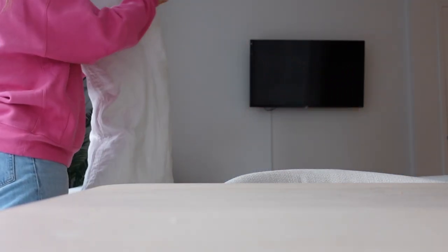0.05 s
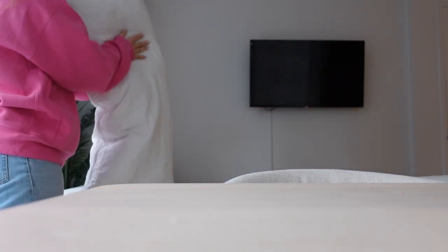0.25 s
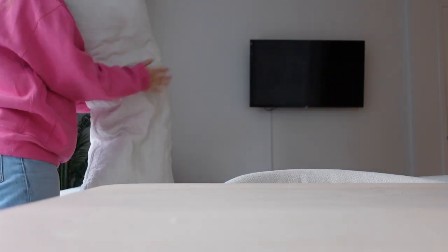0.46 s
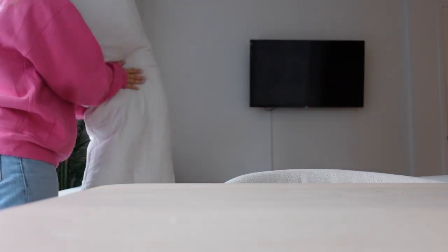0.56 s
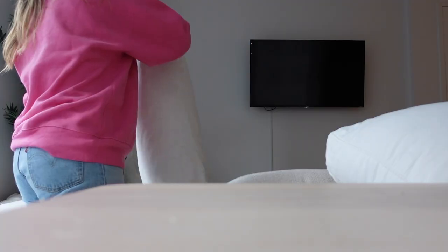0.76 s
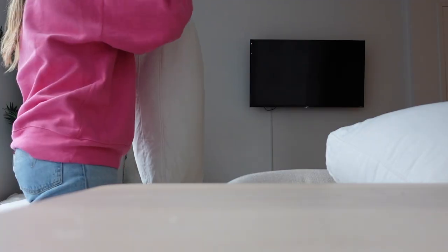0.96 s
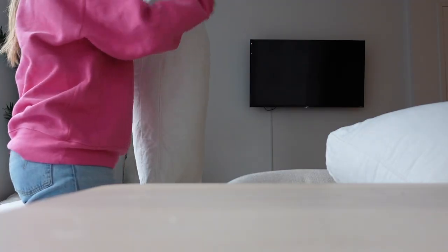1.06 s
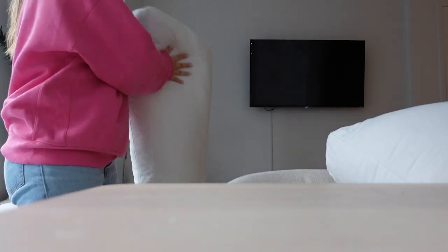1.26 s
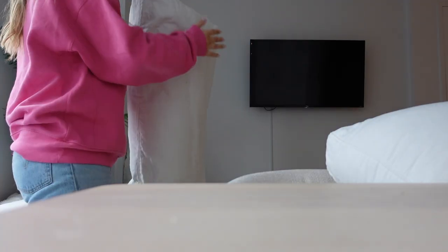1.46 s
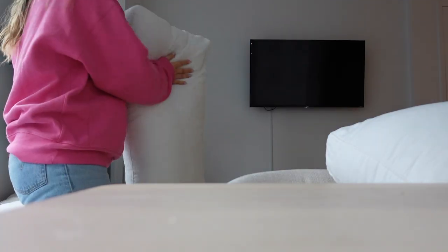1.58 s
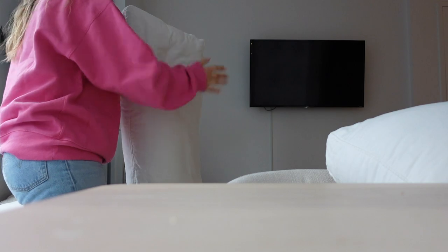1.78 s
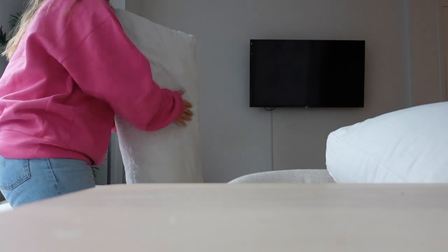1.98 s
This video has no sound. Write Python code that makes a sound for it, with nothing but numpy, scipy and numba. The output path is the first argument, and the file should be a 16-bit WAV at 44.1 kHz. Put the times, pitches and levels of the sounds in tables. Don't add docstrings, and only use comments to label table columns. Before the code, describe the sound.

Couch pillow patted by hand in a bare, ringing living room, a couple of metres from the microphone. A pat's tail and faint bracelet tinkle open; quick slappy thumps cluster at 0.2-0.27 s, and a strong one lands at 0.53. At 0.77 the tail cuts abruptly to rustling cloth. One dull thump follows at 1.24, a scuffed double at 1.6, a softer cluster at 1.9, then a filling shuffle at 2.0.

```python
import sys
import numpy as np
from scipy import signal
from scipy.fft import rfft, irfft
from scipy.io import wavfile
from scipy.ndimage import uniform_filter1d
from numba import njit

SR = 44100
rng = np.random.default_rng(int(sys.argv[2]) if len(sys.argv) > 2 else 0)


def dump(signal):
    limited = np.clip(np.atleast_2d(signal).T, -1, 1)
    pcm = np.round(limited * 32767).astype(np.int16)
    wavfile.write(sys.argv[1], SR, pcm)


def linear_from_db(decibels):
    return 10 ** (np.asarray(decibels, float) / 20)


N = 89434
RING_OUT = 28672

# freq_hz [Hz], level_db [dB], t60_s [s], side_db [dB re mid]
TAIL = [(60, 4, 0.3, -33), (194, 3, 0.39, -26.5), (530, 7.5, 0.43, -16.5), (1120, 7, 0.44, -9),
        (3060, -2, 0.45, -8), (5940, -1.5, 0.46, -7), (9500, -4.5, 0.38, -7), (16000, 9, 0.37, -10)]


def read(table, hz, order=1):
    table = np.array(table, float)
    return np.interp(np.log(np.maximum(hz, 1)), np.log(table[:, 0]), table[:, order])


def noise(table, size):
    gain = linear_from_db(read(table, np.fft.rfftfreq(size, 1 / SR)))
    x = irfft(rfft(rng.standard_normal(size)) * gain, size)
    return x / x.std()


def walk(rate_hz):
    k = int(SR / rate_hz)
    steps = np.repeat(rng.standard_normal(N // k + 1), k)
    x = uniform_filter1d(steps, k)[:N]
    return x / x.std()


def rings(table, t, gain, phase):
    total = 0
    for (hz, db, t60_s), g, p in zip(table, gain, phase):
        total = total + g * linear_from_db(db - 60 * t / t60_s) * np.sin(2 * np.pi * hz * t + p)
    return total


def hum():
    # freq_hz [Hz], level_db [dB]
    hum_colour = [(15, -65), (25, -16), (269, 3), (749, -12.5), (1120, -14), (1680, -24), (2030, -21.5),
                  (5520, -33), (15800, -34.5)]
    level_db, wander_db = -49.5, 1.2
    side_colour = [(hz, db + read(TAIL, hz, order=3)) for hz, db in hum_colour]
    mid = linear_from_db(level_db + wander_db * walk(9.92)) * noise(hum_colour, N)
    side = linear_from_db(level_db - 11) * noise(side_colour, N)
    return np.array([mid, side])


def cloth():
    # time_s [s], level_db [dB]
    rub_effort = [(0, -48), (0.121, -58.5), (.19, -55.5), (.4, -65), (.5, -57), (.7, -64), (.765, -62),
                  (0.774, -51.5), (.87, -55), (.93, -60), (1.05, -56.5), (1.15, -55), (1.232, -49.5),
                  (1.45, -55), (1.56, -70), (1.78, -57.5), (1.88, -67), (2.03, -58)]
    # freq_hz [Hz], level_db [dB]
    rub_colour = [(290, -40), (500, -26), (1440, -6), (2870, -4), (3130, -6.5), (5190, -8), (15800, -18.5)]
    # centre_s [s], length_s [s], level_db [dB], centre_hz [Hz]
    shuffles = [
        (0.868, 0.04, -49.5, 940),
        (0.83, .07, -56, 236),
        (1.01, 0.031, -65, 450),
        (1, 0.027, -54, 230),
        (2, 0.034, -34, 520),
        (0.41, .025, -62, 700),
        (1.59, 0.0075, -28, 970),
        (1.622, 0.0096, -42, 4300),
    ]
    flicker_db = 1.2
    t = np.arange(N) / SR
    effort_db = np.interp(t, *np.array(rub_effort).T)
    hiss = np.array([noise(rub_colour, N), linear_from_db(-8) * noise(rub_colour, N)])
    out = hiss * linear_from_db(effort_db + flicker_db * walk(70.2))
    for centre_s, length_s, db, hz in shuffles:
        colour = [(hz / 3, -30), (hz / 1.25, 0), (hz * 1.35, 0), (hz * 3, -30)]
        out[0] += linear_from_db(db) * noise(colour, N) * np.exp(-((t - centre_s) / length_s) ** 2)
    return out


def bracelet():
    partial_hz = [5227, 8823, 12990]
    # level_db [dB], t60_s [s]
    partial_decay = [(-2, .25), (-6, .22), (-3, .16)]
    # start_s [s], level_db [dB]
    knocks = [
        (0, -56),
        (.046, -57),
        (.073, -63),
        (.385, -69),
    ]
    jangle_db = 4
    partials = [(hz, *row) for hz, row in zip(partial_hz, partial_decay)]
    out = np.zeros(N)
    for start_s, db in knocks:
        t = np.arange(N) / SR - start_s
        gain_chance, phase = rng.standard_normal((len(partials), 2)).T
        out += linear_from_db(db) * (t >= 0) * rings(partials, np.maximum(t, 0), linear_from_db(gain_chance), phase)
    return np.array([out, 0.4 * out]) * linear_from_db(jangle_db * walk(190))


def tail_bands():
    level_db, rise_s = -28.5, 0.0031
    t = np.arange(RING_OUT) / SR
    f = np.fft.rfftfreq(RING_OUT, 1 / SR)
    white = rfft(rng.standard_normal((2, RING_OUT)))
    rise = 1 - np.exp(-(t / rise_s) ** 2)
    bands, fades = [], []
    for hz in 44 * 2 ** np.arange(0, 9, .5):
        octaves = np.log2(np.maximum(f, 1) / hz)
        band = irfft(white * np.cos(np.pi * np.clip(octaves, -.5, .5)) ** 2, RING_OUT)
        bands.append(band * np.array([[1], [linear_from_db(read(TAIL, hz, order=3))]]))
        fade_db = level_db + read(TAIL, hz) - 60 * t / read(TAIL, hz, order=2)
        fades.append(linear_from_db(fade_db) * rise)
    return np.array(bands), np.array(fades)[:, None]


def room(bands, fades):
    # freq_hz [Hz], level_db [dB], t60_s [s]
    room_modes = [(81.8, -26, 0.7), (103.3, 2.5, 0.24), (127.4, -5.5, 0.65), (166.1, -22, 0.91),
                  (189.4, -2, 0.39), (214.1, 2.5, 0.29), (247.7, -13.5, 0.42), (283, -0.5, 0.42),
                  (310.4, -3.5, 0.32), (347.2, 6.5, 0.16), (417, -2.5, 0.21), (450, -12.5, 0.15),
                  (474.7, -10.5, 0.44), (551, -5, 0.39)]
    echo_s = [.0065, .0135]
    # level_db [dB], pan [-1..1]
    echoes = [(-12.5, 0.047), (-7.5, -0.26)]
    modes_db, scatter_db, rise_cycles = -43, 3, 1.6
    port_lag = 0.24
    t = np.arange(RING_OUT) / SR
    gain_chance, phase_chance = rng.standard_normal((len(room_modes), 2)).T
    out = (np.roll(bands, rng.integers(RING_OUT), axis=2) * fades).sum(axis=0)
    build = [1 - np.exp(-t * hz / rise_cycles) for hz, _, _ in room_modes]
    gain = linear_from_db(scatter_db * gain_chance)[:, None] * build
    out[0] += linear_from_db(modes_db) * rings(room_modes, t, gain, 1.54 * phase_chance)
    out[0, 0] += 1
    out[1, :2] += port_lag * np.array([1, -1])
    for delay_s, (db, pan) in zip(echo_s, echoes):
        out[:, int(delay_s * SR)] += linear_from_db(db) * np.array([1, pan])
    return out


def pat(late_s, push_db, push_hz, slap_db, puff_db, slap_hz, slap_cycles, snap_db, fall_s):
    # freq_hz [Hz], level_db [dB]
    puff_colour = [(300, -30), (800, 3.5), (1600, -2), (3000, -1), (5500, -5.5), (9000, -13.5),
                   (13000, -28), (16000, -38)]
    snap_hz, snap_cycles, push_damp, rise_share = 7900, 1.13, 2.95, 0.36
    t = np.maximum(np.arange(8192) / SR - late_s, 0)

    def ring(hz, cycles):
        decay = 3 * hz * t / cycles
        return np.sin(2 * np.pi * hz * t) * np.e * decay * np.exp(-decay)

    push = -ring(push_hz, 3 / push_damp)
    slap = ring(slap_hz, slap_cycles) + linear_from_db(snap_db) * ring(snap_hz, snap_cycles)
    puff_env = (1 - np.exp(-t / fall_s / rise_share)) * np.exp(-t / fall_s)
    puff = noise(puff_colour, 8192) * puff_env
    return linear_from_db(push_db) * push + linear_from_db(slap_db) * slap + linear_from_db(puff_db) * puff


def pats():
    # start_s [s], push_db [dB], push_hz [Hz], slap_db [dB], puff_db [dB]
    pat_rows = [(-.09, -14, 323, -24, -24.5), (0.2098, -28.5, 325, -30, -40), (.231, -15, 343, -19, -23.5),
                (0.2372, -14, 343, -10, -21.5), (.262, -11, 324, -26, -19), (0.528, -18.5, 430, -39, -27.5),
                (0.535, -6, 338, -9.5, -27), (1.2440, -10, 382, -14.5, -32), (1.578, -29, 410, -65, -43),
                (1.5838, -10, 363, -16, -25.5), (1.608, -14.5, 233, -22, -30.5),
                (1.895, -34, 410, -59, -47), (1.9036, -10.5, 378, -24, -34.5),
                (1.912, -15.5, 290, -13, -33.5), (1.9192, -20, 249, -26, -38.5)]
    # slap_hz [Hz], slap_cycles [cycles], snap_db [dB], puff_fall_s [s]
    skin_rows = [(4070, 0.56, -9, 0.026), (1200, 0.61, -30, 0.025), (1360, 1.2, -9.5, 0.0091),
                 (2700, 1.06, -0.5, 0.016), (2560, 2.5, -2, 0.02), (1924, 0.95, -25, 0.003),
                 (2936, 1.68, -12, 0.022), (1860, 0.5, -23, 0.029), (1413, 0.84, -37, 0.0027),
                 (3040, 0.69, -14, 0.0076), (2000, 1.3, -25, 0.018), (1500, 1, -25, .008),
                 (1495, 1.2, -26, .008), (3520, 0.87, -15, 0.0072), (4900, 0.674, -15, 0.04)]
    change_s, fade_s = .766, 0.0024
    lead = int(.12 * SR)
    bands, fades = tail_bands()
    out = np.zeros((2, 2, N + 2 * SR))
    for (start_s, *hit), skin in zip(pat_rows, skin_rows):
        at = start_s * SR + lead
        dry_pat = pat(at % 1 / SR, *hit, *skin)
        heard = signal.fftconvolve(dry_pat[None], room(bands, fades), axes=1)
        out[int(start_s > change_s), :, int(at):int(at) + heard.shape[1]] += heard
    before, after = out[:, :, lead:lead + N]
    return before * np.clip((change_s - np.arange(N) / SR) / fade_s, 0, 1) + after


def scene():
    mid, side = pats() + cloth() + bracelet() + hum()
    return np.array([mid + side, mid - side])


@njit
def follow(x, up, down):
    e, out = 1e-6, np.empty(len(x))
    for i in range(len(x)):
        e += (x[i] - e) * (up if x[i] > e else down)
        out[i] = e
    return out


def band_limit(x):
    return signal.sosfilt(signal.butter(12, 15950, fs=SR, output="sos"), x)


def record(dry):
    threshold_db, ratio, attack_s, release_s = -16, 1.545, 0.00061, 0.027
    low_cut = signal.butter(3, 67.6, "high", fs=SR, output="sos")
    top_cut = signal.butter(2, 13600, fs=SR, output="sos")
    x = signal.sosfilt(np.vstack([low_cut, top_cut]), dry)
    level = follow(np.abs(x).max(axis=0), 1 / (attack_s * SR), 1 / (release_s * SR))
    gain = np.minimum(linear_from_db(threshold_db) / level, 1) ** (1 - 1 / ratio)
    return band_limit(x * gain)


dry = scene()
out = record(dry)
dump(out)
```